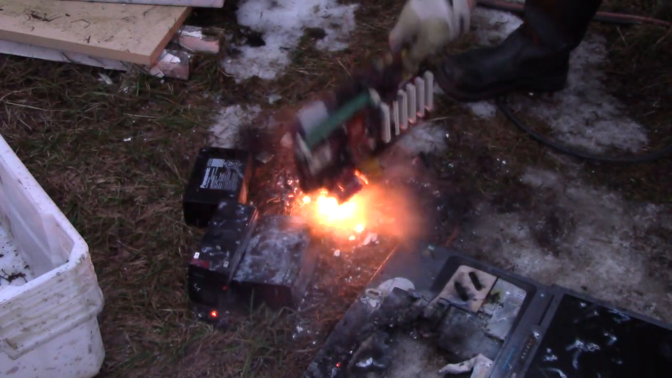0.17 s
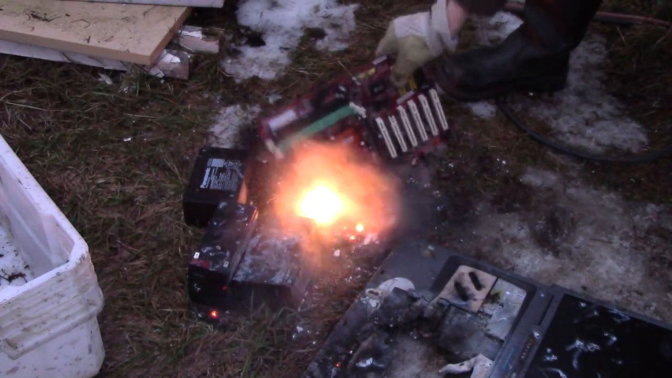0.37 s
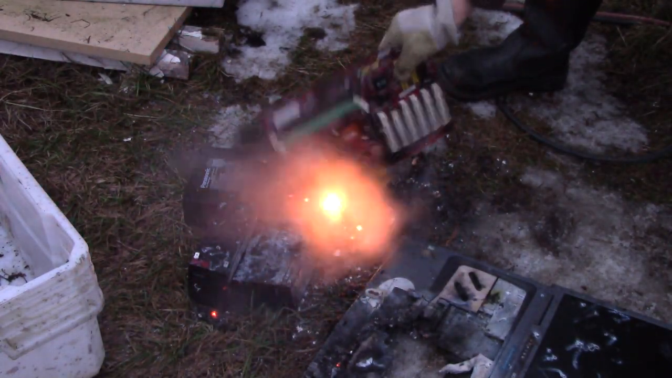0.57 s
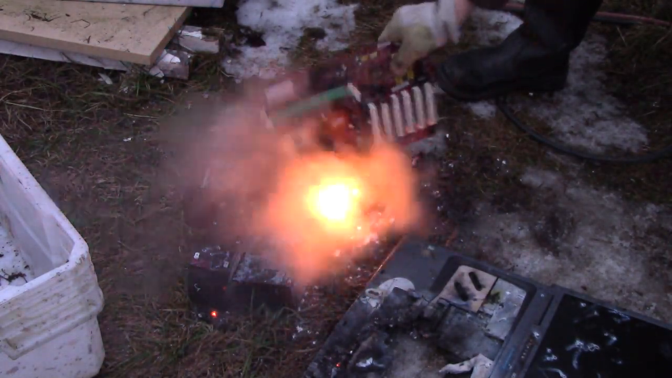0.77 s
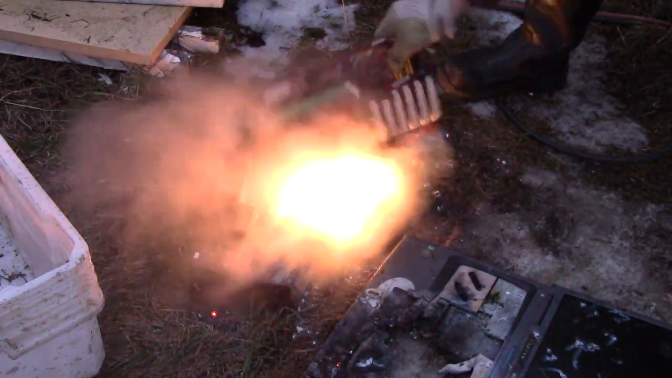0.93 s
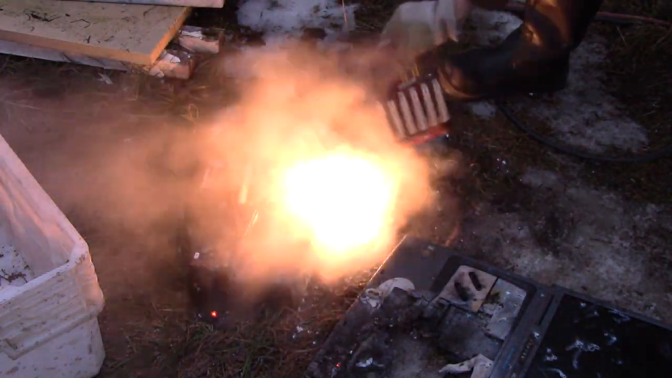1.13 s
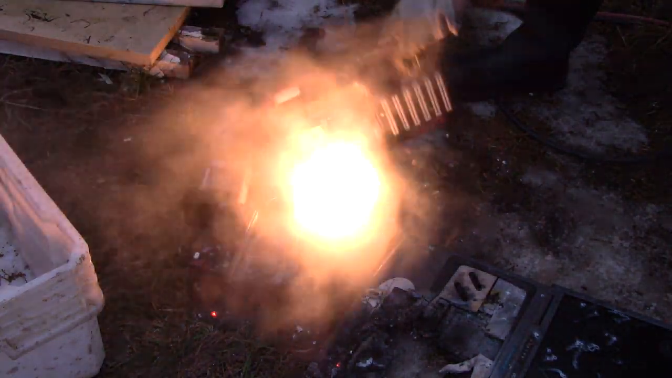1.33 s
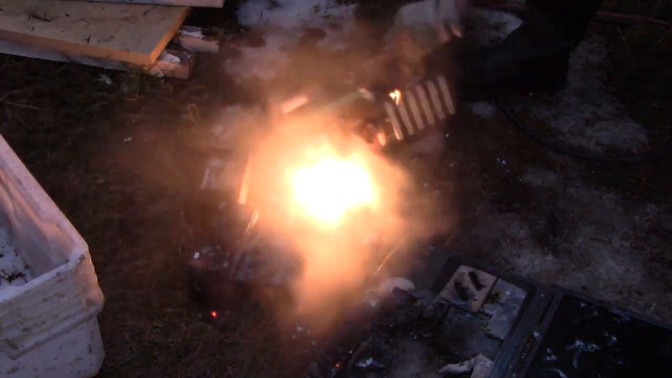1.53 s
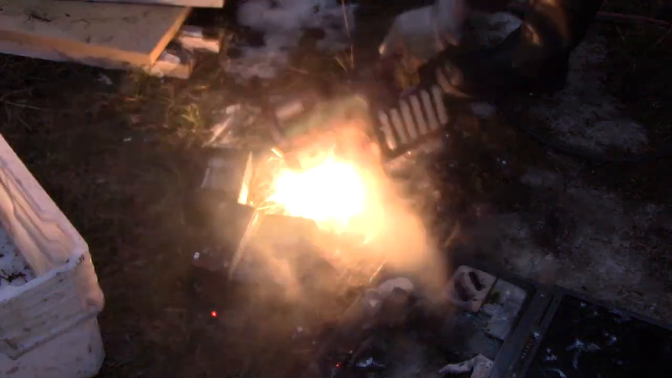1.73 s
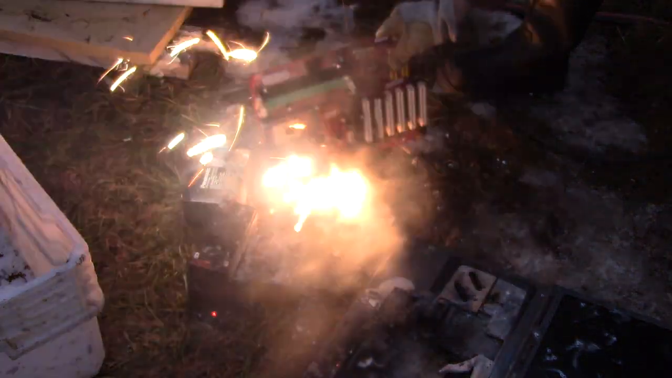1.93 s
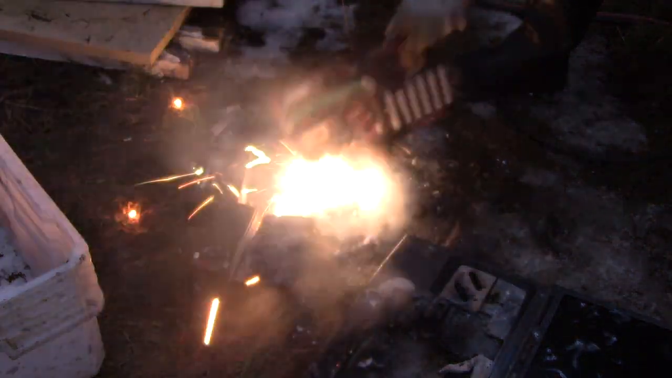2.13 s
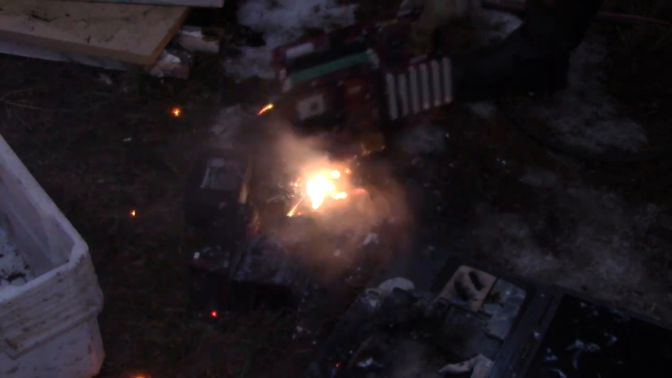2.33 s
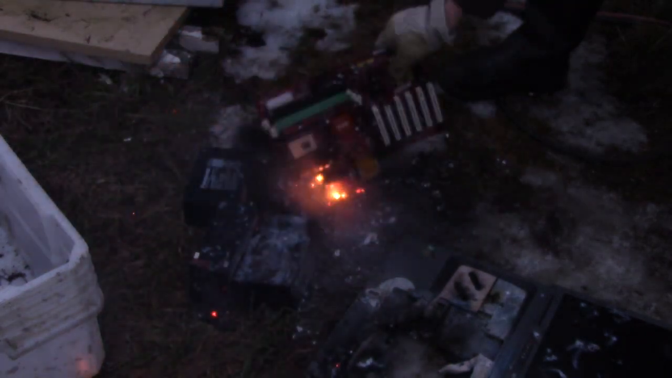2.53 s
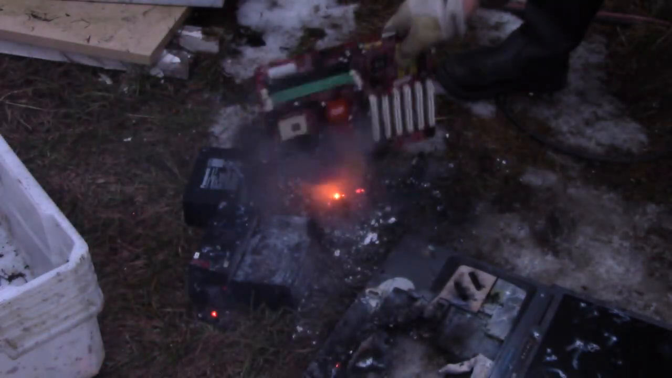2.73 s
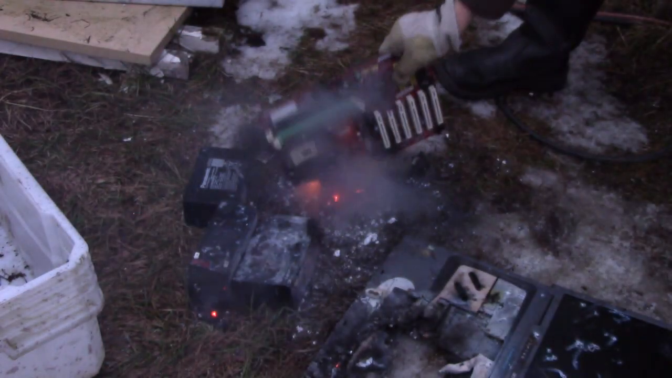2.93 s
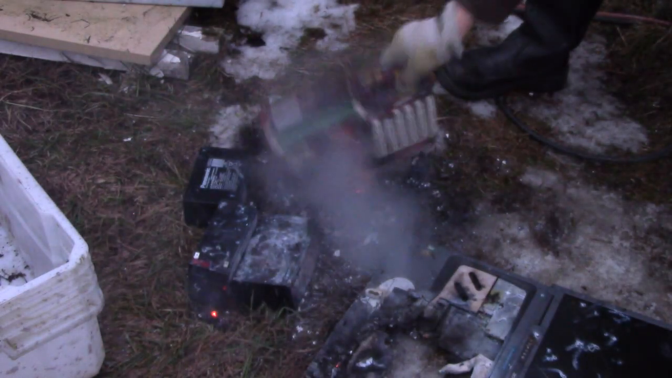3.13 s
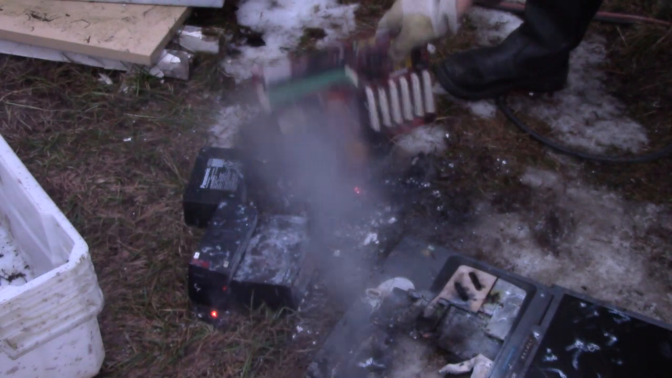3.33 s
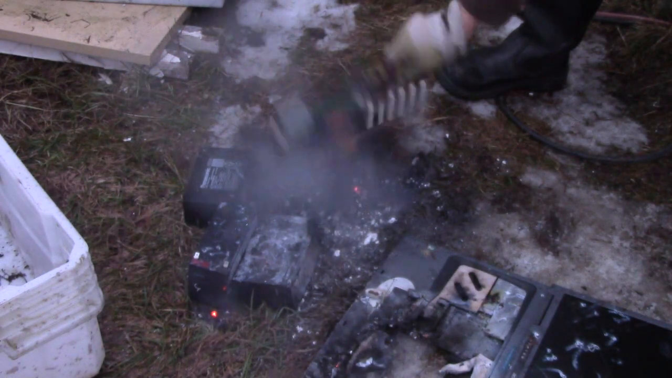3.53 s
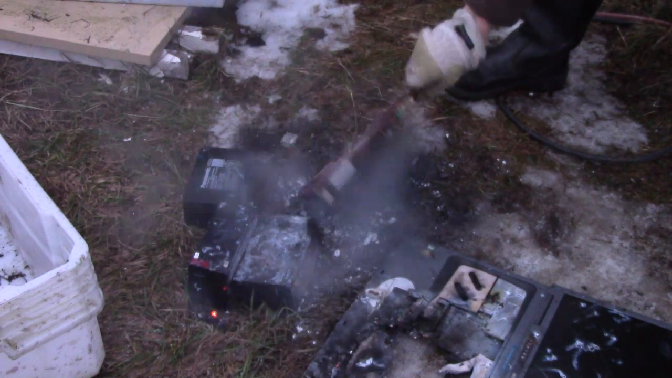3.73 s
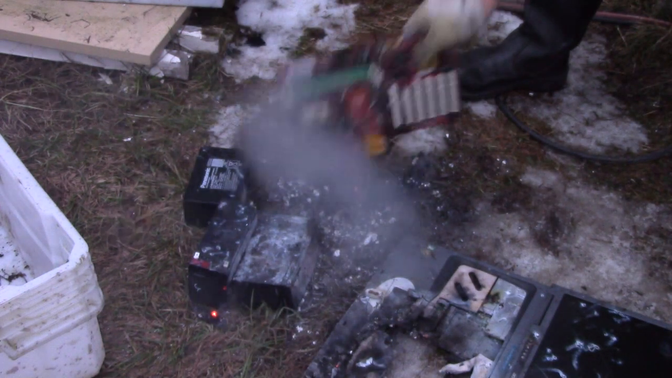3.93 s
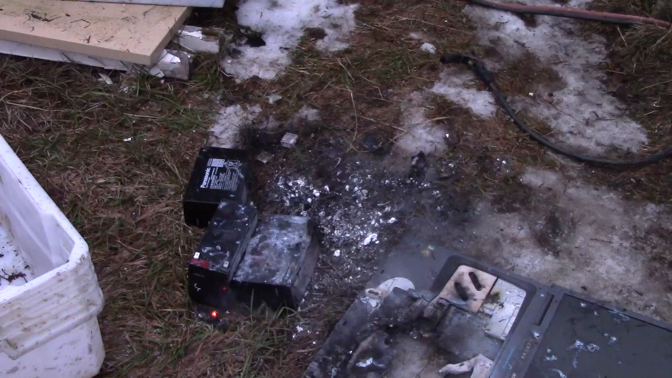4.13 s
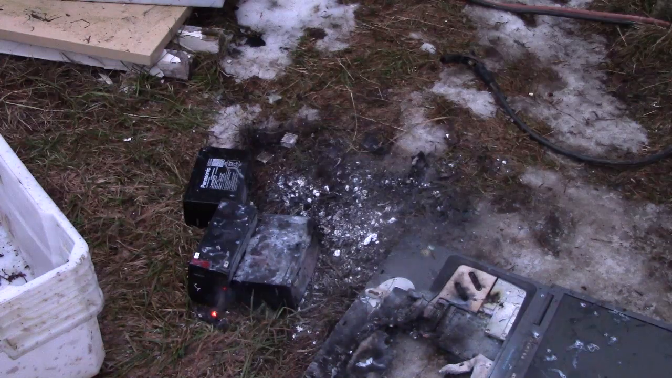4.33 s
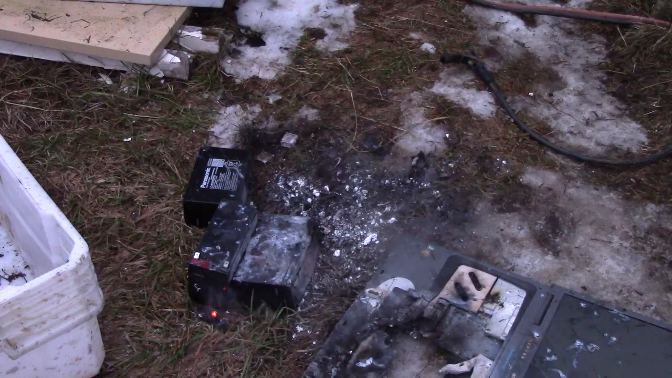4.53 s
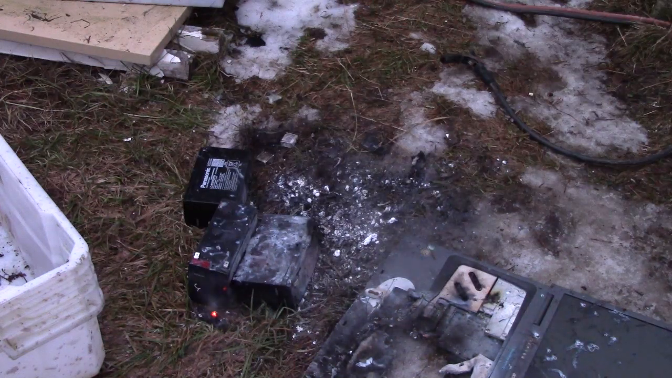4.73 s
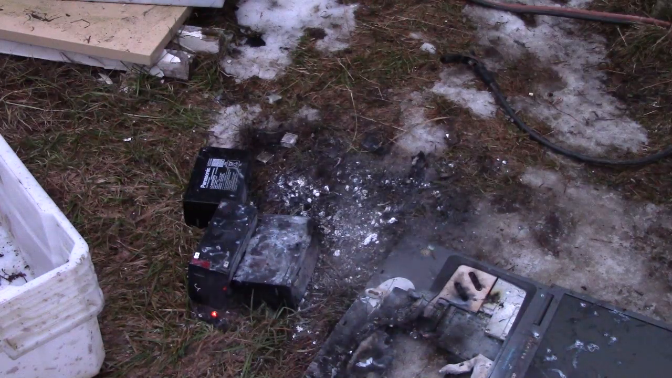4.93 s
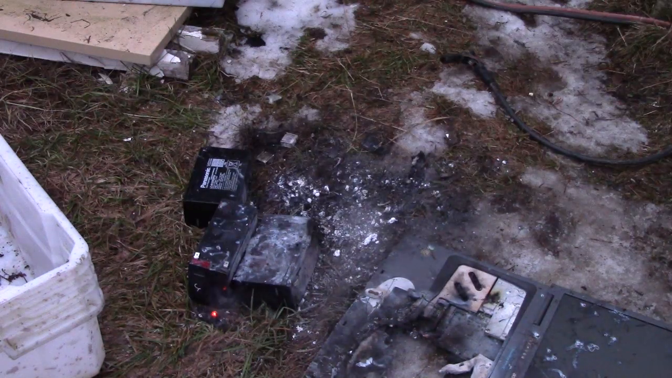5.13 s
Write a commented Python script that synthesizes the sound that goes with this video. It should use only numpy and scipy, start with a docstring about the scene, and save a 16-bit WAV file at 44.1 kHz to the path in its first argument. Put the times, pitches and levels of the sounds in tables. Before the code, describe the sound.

A close outdoor microphone hears low yard murmur, fine hot-metal sizzle and light lumpy wind. From 0 to 0.2 s a weak arc spits, with a short board scrape at 0.4 s and a softer one at 0.65 s. At 0.85 s a harsh, noisy arc erupts, crackling and snapping unevenly through 1.7 s, with separate spits around 1.5 s. At 1.8 s it leaps up with a low thump; at 2.09 s comes the loudest blast, dense with sharp cracks, breaking into stutters and ending by 2.5 s. Short scuffs follow at 2.6 and 2.9 s, a bright knock at 3.2 s, and a strong dull knock with skid at 3.55 s. Low bumps and wind puffs build near 4.1 s. At 4.17 s sizzle and wind drop abruptly; quiet murmur remains with small ringing ticks from 4.5 s, faint scraping, two very faint thin tones until 4.9 s, and soft low puffs to the end.

```python
"""Yard murmur, sizzling hot metal and light lumpy wind: coloured noises that start first and run throughout.
A gloved hand taps and drags a circuit board over a live copper rod on a bank of batteries, outdoors on wet grass.
The arc burns in ragged spells of noisy micro-sparks, with sharp filtered-click cracks and low wavelet thumps;
the board knocks and skids as ringing modes, amid short low bumps: centred thuds and leaning wind puffs.
At 4.17 s sizzle and wind drop abruptly, leaving small ringing ticks and two faint thin tones of resonant noise."""
import sys
import numpy as np
from scipy import signal
from scipy.fft import rfft, irfft
from scipy.io import wavfile

SR = 44100
rng = np.random.default_rng(int(sys.argv[2]) if len(sys.argv) > 2 else 0)


def master(y):
    """Save y as 16-bit WAV."""
    cut = np.clip(np.atleast_2d(y).T, -1, 1)
    pcm = np.round(cut * 32767)  # scale
    wavfile.write(sys.argv[1], SR, pcm.astype(np.int16))


N = 232832

# Ringing modes of the board. Each row: frequency in Hz, level in dB, t60 in seconds.
BOARD_MODES = [(260, -1.5, 0.061), (658, -9, 0.054), (712, -2, 0.008), (1180, -2.5, 0.016),
               (1510, -3, 0.015), (1890, -10.5, 0.015), (2850, -5.5, 0.025), (3380, 5.5, 0.0058),
               (3770, -11, 0.0039), (4320, -4.5, 0.018), (5120, -6.5, 0.022), (7160, -1, 0.0044),
               (8260, -6, 0.0065), (10500, -8, 0.0055), (11600, -24, .005)]
# Spectrum of arc and rasp. Each row: frequency in Hz, relative level in dB.
ARC_SPECTRUM = [(90, -26.5), (160, -15.5), (380, -5), (600, -1), (1000, -3.5), (1900, -2), (2800, -9),
                (4500, -5), (6000, -12), (8300, -4.5), (12500, -14), (15500, -23.5)]


def from_db(db):
    """Amplitude gain of a level in dB."""
    return 10 ** (np.asarray(db, float) / 20)


def rms_one(x):
    """Scale to rms 1."""
    return x / np.sqrt(np.mean(x ** 2) + 1e-20)


def colour(x, spectrum, size=2048):
    """Minimum-phase filter following a (Hz, dB) table, built by folding the cepstrum."""
    hz, db = np.transpose(spectrum)
    grid_hz = np.maximum(np.fft.rfftfreq(size, 1 / SR), 1)
    log_gain = np.interp(np.log(grid_hz), np.log(hz), db) * np.log(10) / 20
    cepstrum = irfft(log_gain, size)
    cepstrum[1:size // 2] *= 2
    cepstrum[size // 2 + 1:] = 0
    impulse = irfft(np.exp(rfft(cepstrum)), size)
    return signal.fftconvolve(x, impulse)[:len(x)]


def butter(x, hz, kind, order=2):
    """Causal Butterworth filter."""
    return signal.sosfilt(signal.butter(order, hz, kind, fs=SR, output="sos"), x)


def drift(rate_hz):
    """Slow random curve, rms 1: white noise through a double pole; the first second is dropped."""
    r = np.exp(-2 * np.pi * rate_hz / SR)
    slow = signal.lfilter([1], [1, -2 * r, r * r], rng.standard_normal(N + SR))
    return rms_one(slow[SR:])


def grains(per_s, spread_db):
    """Random clicks of either sign and very uneven size; rms 1."""
    size_db = spread_db * np.minimum(rng.exponential(1, N), 5)
    sizes = from_db(size_db) * rng.choice([-1, 1], N)
    struck = rng.random(N) < per_s / SR
    return rms_one(sizes * struck + 1e-9)


def ring(clicks, hz, t60_s):
    """Two-pole resonator: a unit click starts a decaying sine of height 1."""
    r, w = from_db(-60 / (t60_s * SR)), 2 * np.pi * hz / SR
    return signal.lfilter([0, np.sin(w)], [1, -2 * r * np.cos(w), r * r], clicks + 1e-18)


def bursts(rows, attack_ms, sag_db, release_ms):
    """Band powers of bursts that leap up, sag over their length and die; edges are ms per 10 dB."""
    power = np.zeros((3, N + SR))
    ms = np.arange(-SR // 50, SR // 4) * 1000 / SR
    for start_s, db, length_ms, bass_db, treble_db in rows:
        rise_db = 10 * ms / max(attack_ms, .2)
        sag = -sag_db * np.minimum(ms / max(length_ms, .1), 1)
        fall_db = -10 * np.maximum(ms - length_ms, 0) / max(release_ms, .5)
        shape_db = np.where(ms < 0, rise_db, sag + fall_db)
        band_db = np.array([[bass_db], [0], [treble_db]])
        at = round(start_s * SR) - SR // 50
        power[:, at:at + len(ms)] += from_db(2 * (shape_db + db + band_db))
    return power[:, :N]


def three_bands(power, sources, edges_hz):
    """Give bass, middle and treble of steady sources their power in time."""
    low_hz, high_hz = edges_hz
    parts = [butter(sources[0], low_hz, "low", order=4),
             butter(sources[1], edges_hz, "band", order=3),
             butter(sources[2], high_hz, "high", order=4)]
    return sum(np.sqrt(p) * rms_one(part) for p, part in zip(power, parts))


def puff(hz, turns, phase):
    """A cosine of a few turns under a bell-shaped envelope, centred in its 3001 samples."""
    t = np.arange(-1500, 1501) / SR
    return np.exp(-(t * hz / turns) ** 2) * np.cos(2 * np.pi * hz * t + phase)


def place(rows, shapes):
    """Centre each shape at its row's time in seconds, scaled by its level in dB."""
    out = np.zeros(N + 3001)
    for row, shape in zip(rows, shapes):
        at = round(row[0] * SR)
        out[at:at + len(shape)] += from_db(row[1]) * shape
    return out[1500:N + 1500]


def background():
    """Mid and side of yard murmur, sizzling metal and lumpy wind rumble, all coloured noise."""
    # Two stretches of breakpoints. Each row: time in seconds, murmur, sizzle and wind levels in dB.
    stretches = [
        [(0.0, -58.5, -56.5, -75), (0.25, -56, -55.5, -59), (0.7, -57, -54.5, -79), (2.6, -52.5, -52.5, -71),
         (3.4, -53, -53, -57), (3.97, -54, -51.5, -55), (4.17, -53, -53.5, -47)],
        [(4.172, -53.5, -60.5, -63), (4.66, -50.5, -61.5, -65), (4.94, -50.5, -59, -52),
         (5.28, -54, -60.5, -62.5)],
    ]
    # Noise spectra. Each row: frequency in Hz, relative level in dB.
    yard_spectrum = [(88, -65), (150, -20), (324, 2.5), (356, -0.5), (538, 0.5), (1210, -5), (1350, -6.5),
                     (1880, -9.5), (4000, -16.5), (5200, -69), (8800, -120)]
    sizzle_spectrum = [(1200, -45), (2500, -40), (3200, -9), (4300, -2), (5900, -4.5), (8500, 3.5),
                       (12000, -7), (15500, -10.5)]
    wind_spectrum = [(20, -39), (60, 5.5), (130, 4.5), (250, -1.5), (500, -21), (2000, -77)]
    s, *levels = np.transpose(np.concatenate(stretches))
    yard_db, sizzle_db, wind_db = [np.interp(np.arange(N) / SR, s, db) for db in levels]
    yard_side_db = np.minimum(yard_db, -53) - 12  # side level of the murmur, capped at -65 dB
    yard = np.array([rms_one(colour(rng.standard_normal(N), yard_spectrum)) * from_db(1.74 * drift(13.0) + db)
                     for db in (yard_db, yard_side_db)])
    spit = .4 * grains(1500, 4.5)
    sizzle = rms_one(colour(rng.standard_normal(N) + spit, sizzle_spectrum)) * from_db(sizzle_db)
    lumps_db = 4.5 * drift(14)
    wind = np.array([rms_one(colour(rng.standard_normal(N), wind_spectrum, size=8192)) * from_db(lumps_db + db)
                     for db in (0, -11)])
    return yard + sizzle * np.array([[1], [0]]) + from_db(wind_db) * wind


def burning():
    """Bass, middle and treble level of the burn in dB over time, -120 dB between spells."""
    # Five spells of arc. Each row: time in seconds, middle-band rms in dB, bass and treble in dB re the middle.
    spells = [
        [(0.03, -61, 3, 0), (0.05, -48.5, -8, 8), (0.065, -53, -10, 1), (0.118, -54.5, -5, -7),
         (0.14, -48.5, -10, 2), (0.2, -60.5, -2, 6)],
        [(0.845, -59, -9, -4), (0.851, -46, -15, -14), (0.859, -51.5, 10, 0), (0.881, -26.5, -2, 7),
         (0.903, -29.5, 4.5, 5), (0.967, -41.5, 3, 5.5), (1.01, -38, 3, 4.5), (1.047, -38, 0, -2),
         (1.065, -46, 5.5, 7), (1.1, -37.5, 0.5, 5)],
        [(1.1, -35, 2.5, -4), (1.124, -25, 4.5, 5.5), (1.166, -31, -0.5, 5.5), (1.2, -44.5, 7.5, 2),
         (1.256, -39.5, 6, 5.5), (1.274, -42.5, 2.5, -3.5), (1.35, -36, -1, 2), (1.366, -41.5, 0, 6),
         (1.426, -45, -0.5, 2), (1.485, -52.5, 1, 2), (1.517, -43, -1.5, 1), (1.575, -35, 1, -3),
         (1.62, -45.5, -0.5, -5), (1.72, -59, 0, 7)],
        [(1.78, -66, 5, 4), (1.796, -21.5, 9, 9), (1.834, -25.5, -2.5, 6.5), (1.864, -34, 2, 6),
         (1.895, -28.5, -2, 7), (1.92, -31.5, -3.5, 2.5), (1.944, -23.5, -16, 5.5), (1.966, -22, -15, -1.5),
         (1.974, -36.5, -1.5, 3), (2.02, -38, -6, 3.5), (2.035, -51.5, -8, 11), (2.07, -53, 6, 7)],
        [(2.07, -61, 8, -3), (2.086, -14, 1, 1), (2.132, -25, 5.5, 3), (2.176, -20, -2.5, 1.5),
         (2.206, -34, 5.5, 7.5), (2.243, -30, 8.5, 1.5), (2.272, -21.5, -1.5, 2.5), (2.29, -37.5, 0, 1),
         (2.39, -46.5, 3, -5), (2.458, -46.5, 6, -13), (2.5, -57, -1, 4)],
    ]
    s, db, bass_db, treble_db = np.transpose(np.concatenate(spells))
    t = np.arange(N) / SR
    lit = sum((t >= spell[0][0]) & (t < spell[-1][0]) for spell in spells)
    return np.array([np.where(lit, np.interp(t, s, level), -120)
                     for level in (db + bass_db, db, db + treble_db)])


def flares():
    """Dense micro-sparks over plasma hiss; sparse grains fill the bass, dense ones the treble."""
    # Short spits as the arc restrikes. Each row: start in seconds, middle-band level in dB, length in ms,
    # bass and treble in dB re the middle.
    spits = [(0.948, -37, 5, -1, 10), (1.328, -29.5, 4, 6, 5), (1.374, -31, 4.7, 6.5, 9),
             (1.394, -33.5, 5.2, -4, 14), (1.49, -31, 8, 5.5, 5.5), (1.501, -25.5, 6, -12, -1),
             (1.528, -34, 9, -17, 0), (1.541, -21, 5, -28, -7), (1.555, -23.5, 5, -17, 3),
             (1.605, -38.5, 4.8, -8, 12), (1.6266, -44.5, 22, -12, 9), (1.671, -46, 6, -0.5, 6),
             (1.693, -38, 13, -5, -5), (2.22, -33, 4, -4, 12), (2.296, -24, 12.6, 1, 2),
             (2.318, -25, 18, 2, 5), (2.35, -32.5, 6.9, 5, -4), (2.3736, -33, 5.4, 8, 4),
             (2.397, -32.5, 12, 8.5, 1.5), (2.4156, -36, 11, 3, -12), (2.4306, -34, 10, -1, -4),
             (2.4435, -26.5, 2.8, 6, 2)]
    shared = grains(3000, 1.44)
    sputter_db = 0.68 * drift(160)
    fizz = []
    for per_s in (1500, 3000, 6000):
        micro_sparks = .5 * shared + grains(per_s, 3.5)
        flicker = from_db(sputter_db + 2.5 * drift(120))
        hiss = .6 * rng.standard_normal(N)
        fizz.append(colour(micro_sparks * flicker + hiss, ARC_SPECTRUM))
    power = from_db(2 * burning()) + bursts(spits, attack_ms=1, sag_db=9, release_ms=5.3)
    return three_bands(power, fizz, edges_hz=(2800, 6200))


def sparks():
    """Rows of the loud sparks, then chance ones that grow with the burn."""
    # Loud single sparks. Each row: time in seconds, size in dB, dullness in dB.
    loud = [(0.0766, -22, -8), (0.0927, -23, -2), (0.1289, -27, -3), (0.1386, -24, -6), (0.1776, -21, 2),
            (0.2335, -22, -15), (0.9057, -7, 3), (0.9111, -8, 4), (0.9485, -13, 1), (1.0056, -11, -1),
            (1.0391, -15, 0), (1.0822, -15, 0), (1.1212, -2, 5), (1.131, -5, 8), (1.1712, -6, -13),
            (1.2124, -17, 7), (1.2327, -15, 14), (1.259, -14, 3), (1.3531, -10, 3), (1.3741, -4, -1),
            (1.3951, -10, -5), (1.4023, -12, 1), (1.4526, -24, 2), (1.49, -15, 7), (1.5019, -8, 11),
            (1.5304, -15, -10), (1.5408, -6, -4), (1.5563, -10, -9), (1.6049, -9, 0), (1.6263, -15, -2),
            (1.6726, -22, -5), (1.7643, -28, 10), (1.8342, -4, -8), (1.8793, -7, -11), (1.8846, -3, -9),
            (1.9615, -1, -2), (2.0475, -20, -16), (2.0572, -18, -10), (2.0951, 0, -1), (2.1135, -2, 2),
            (2.1645, -2, -7), (2.1749, -1, -7), (2.1959, -5, -7), (2.221, -6, -7), (2.241, -5, 6),
            (2.2641, -2, 7), (2.2742, -4, 2), (2.282, -3, 3), (2.2983, -6, 4), (2.3499, -17, 12),
            (2.3655, -19, 3), (2.3732, -13, 2), (2.3762, -8, 8), (2.3969, -8, 7), (2.4013, -10, 8),
            (2.4152, -10, 7), (2.4222, -17, 1), (2.4302, -14, 6), (2.4386, -15, 6), (2.4435, -2, 6)]
    strays_per_s, stray_re_burn_db, dull_spread_db = 110, 13, 12
    burn_db = burning()[1]
    at = np.flatnonzero((rng.random(N) < strays_per_s / SR) & (burn_db > -100))
    dull_db = dull_spread_db * rng.standard_normal(len(at))
    strays = np.transpose([at / SR, burn_db[at] + stray_re_burn_db, dull_db])
    return np.concatenate([loud, strays])


def cracks(rows):
    """Each spark is a sharp front plus a broader push, shared out by dullness, then echoed nearby."""
    # Spectrum of one spark. Each row: frequency in Hz, relative level in dB.
    spark_spectrum = [(200, -18), (600, -4), (1800, 0), (2800, -4), (4500, -2), (6000, -6), (8500, -3),
                      (12000, -9), (16000, -22)]
    s, db, dull_db = np.transpose(rows)
    dull_share = 1 / (1 + from_db(-1.5 * dull_db))
    front = np.zeros(N)
    click = np.arange(256) == 0
    for kind, share in (("low", dull_share), ("high", 1 - dull_share)):
        shape = colour(butter(click, 3200, kind), spark_spectrum)
        top = np.argmax(np.abs(shape))
        train = np.zeros(N)
        train[np.round(s * SR).astype(int) - top] = -from_db(db) * share ** .6
        front += signal.fftconvolve(train, shape / shape[top])[:N]
    lag = round(0.00036 * SR)
    bounce = -.5 * np.roll(front, lag)  # off the battery lids
    t = np.arange(SR // 40) / SR
    scatter = rng.standard_normal(len(t)) * from_db(-24 - 60 * t / .02) * (t > .0007)  # nearby boxes, ground
    return front + bounce + signal.fftconvolve(front, scatter)[:N]


def bumps():
    """Mid and side of short low bumps: centred thuds of board and arc, and leaning wind puffs."""
    # Each row: time in seconds, level in dB, frequency in Hz, lean to the left from -1 to 1.
    low_bumps = [(0.18, -46, 170, 0), (0.212, -40.5, 181, 0), (0.247, -37, 191, 0), (0.275, -48, 170, 0),
                 (0.331, -45, 154, -0.072), (1.336, -32, 182, 0), (1.58, -32.5, 145, 0),
                 (2.582, -37.5, 128, 0), (2.895, -34, 116, 0), (2.909, -32.5, 151, 0),
                 (3.115, -42, 111, 0.1), (3.221, -32, 137, 0), (3.272, -31.5, 142, -0.17),
                 (3.302, -28.5, 181, 0.26), (3.541, -27, 205, -0.17), (3.641, -41, 135, -0.2),
                 (3.745, -43.5, 156, -0.31), (3.893, -39, 130, -0.1), (4.009, -37, 119, -0.2),
                 (4.048, -40, 138, -0.1), (4.1, -27.5, 131, 0.12), (4.134, -21.5, 176, -0.3),
                 (4.49, -35.5, 177, 0.03), (4.858, -29, 114, 0.26), (4.886, -25.5, 113, 0.3),
                 (5.092, -36, 140, 0.22), (5.116, -25, 111, 0.087)]
    out_of_step = 2.1  # per unit of lean
    phases = rng.uniform(0, 2 * np.pi, len(low_bumps))
    mids, sides = [], []
    for (_, _, hz, lean), phase in zip(low_bumps, phases):
        mids.append(puff(hz, 0.6, phase))
        leaning = lean * puff(hz, 0.71, phase)
        stray = out_of_step * abs(lean) * puff(1.27 * hz, 0.51, phase + np.pi / 2)
        sides.append(leaning + stray)
    return np.array([place(low_bumps, mids), place(low_bumps, sides)])


def knocks():
    """Board hits rod: each blow rings all modes by chance strengths; a soft contact passes only the low ones."""
    # Each row: time in seconds, level in dB, contact hardness (upper band edge) in Hz.
    blows = [(0.4069, -36.5, 6000), (0.6449, -71, 2940), (3.196, -28, 9000), (3.1992, -37, 2970),
             (3.5521, -20, 2610), (3.5545, -11.5, 1410), (3.558, -29, 1050), (3.5957, -24, 885),
             (3.6018, -28.5, 2800)]
    out = np.zeros(N)
    click = np.arange(SR // 8) == 0
    chance_db = rng.normal(0, 0.58, (len(blows), len(BOARD_MODES)))
    for (s, db, hard_hz), luck_db in zip(blows, chance_db):
        rings = sum(from_db(mode_db + extra_db) * ring(click, hz, t60_s)
                    for (hz, mode_db, t60_s), extra_db in zip(BOARD_MODES, luck_db))
        at = round(s * SR)
        out[at:at + len(click)] += from_db(db) * butter(rings, [380, hard_hz], "band")
    return out


def skids():
    """Board skidding on rod and ground: uneven contact clicks, separate for each mode, plus a rasp."""
    # Each row: start in seconds, middle-band level in dB, length in ms, bass and treble in dB re the middle.
    drags = [(0.407, -22.5, 11.5, -18, -1), (0.418, -35, 69, -10, -0.5), (0.644, -31.5, 28, -10.5, 2),
             (0.668, -41, 38, -9, 0), (2.572, -36.5, 12, -7, 5.5), (2.586, -34, 52, -13, -4),
             (2.886, -39.5, 29, 1.5, 7.5), (2.901, -34, 56, -14, -3.5), (3.195, -32, 27, -1.5, 8.5),
             (3.214, -30.5, 45, -5, -6), (3.549, -28, 4.9, -18, 0), (3.552, -18.5, 13, 2.5, -3.5),
             (3.57, -35.5, 28, 2, -5), (3.59, -40.5, 54, 3, -3), (3.72, -53.5, 190, -3, 4),
             (4.49, -52.5, 110, 4.5, 2.5), (4.565, -57, 330, -6, -2.5), (4.725, -54, 160, -1, -6)]
    body = sum(from_db(db) * rms_one(ring(grains(1800, 3.4), hz, t60_s)) for hz, db, t60_s in BOARD_MODES)
    rasp = rms_one(colour(grains(5000, 4.9), ARC_SPECTRUM))
    scrape = rms_one(body) + 0.67 * rasp
    power = bursts(drags, attack_ms=1.6, sag_db=21, release_ms=8.9)
    return three_bands(power, [scrape] * 3, edges_hz=(1400, 6200))


def thumps():
    """Low pressure kicks of gas blown out by the largest flares, as short wavelets."""
    # Each row: time in seconds, level in dB, frequency in Hz.
    kicks = [(1.8, -8.5, 257), (1.829, -24, 257), (2.088, -15, 233), (2.114, -34, 280)]
    return place(kicks, [puff(hz, 0.74, 0.64) for _, _, hz in kicks])


def whines():
    """Faint thin tones: noise twice through a narrow resonance, wavering, faded in and out."""
    # Each row: start and end in seconds, frequency in Hz, resonance width in Hz, level in dB.
    tones = [(4.174, 4.8, 1838, 30, -63), (4.548, 4.922, 2200, 30, -64.5)]
    out = np.zeros(N)
    t = np.arange(N) / SR
    for start_s, end_s, hz, width_hz, db in tones:
        t60_s = np.log(1000) / (np.pi * width_hz)
        fade = np.clip(np.minimum(t - start_s, end_s - t) / 0.035, 0, 1)
        waver = from_db(2.5 * drift(9.3))
        tone = rms_one(ring(ring(rng.standard_normal(N), hz, t60_s), hz, t60_s))
        out += from_db(db) * fade * waver * tone
    return out


def ticks():
    """Small nearby ticks: a click rings a few cycles, with a brief bright edge."""
    # Each row: time in seconds, click level in dB, frequency in Hz.
    taps = [(4.492, -43, 1070), (4.496, -34, 930), (4.515, -32, 1810), (4.526, -31, 1910),
            (4.536, -29, 1030), (4.574, -30, 980), (4.585, -32, 1830), (4.63, -27, 1370), (4.74, -32, 990),
            (4.76, -37, 999), (4.838, -32, 1700), (4.904, -24, 1400), (5, -25, 7340), (5.107, -40, 6200),
            (5.171, -31.5, 4120), (5.184, -36, 864), (5.205, -40, 7500), (5.238, -36, 6400)]
    out = np.zeros(N)
    for s, db, hz in taps:
        click = np.zeros(N)
        click[round(s * SR)] = from_db(db)
        edge = butter(click, [2000, 11000], "band")
        out += from_db(-3.5) * ring(click, hz, 15.0 / hz) + edge
    return out


def scene():
    """Near sources sit in the middle; a very faint treble noise follows them in the side."""
    near = flares() + cracks(sparks()) + knocks() + skids() + thumps() + whines() + ticks()
    t = np.arange(SR // 100) / SR
    noise_tail = rms_one(rng.standard_normal(len(t)) * from_db(-60 * t / 0.011))
    following_noise = signal.fftconvolve(near, noise_tail)[:N]
    aside = from_db(-52.5) * butter(following_noise, 3300, "high", order=1)
    mid, side = np.array([near, aside]) + bumps() + background()
    return np.array([mid + side, mid - side])


def record(dry):
    """The microphone drops the deep bass, peaks are rounded near full scale, the top is cut."""
    thin = np.array([butter(channel, 74, "high") for channel in dry])
    soft = thin / (1 + np.abs(thin / .99) ** 4) ** .25
    top_cut = signal.ellip(14, .5, 125, 16000, fs=SR, output="sos")  # ripple, stop in dB; edge in Hz
    return signal.sosfilt(top_cut, soft)


dry = scene()
out = record(dry)
master(out)
```